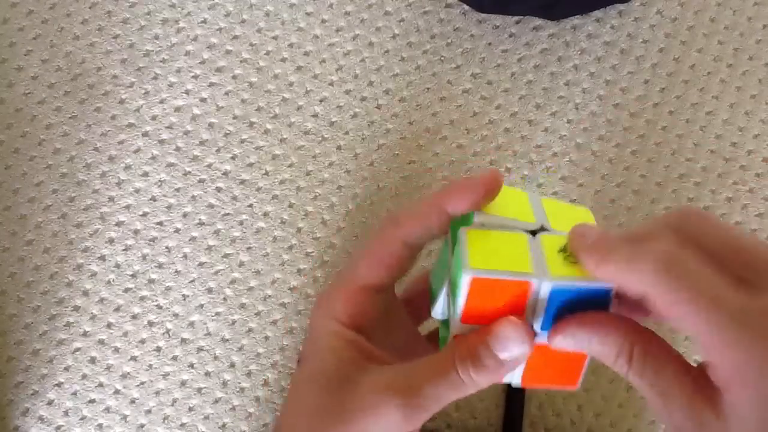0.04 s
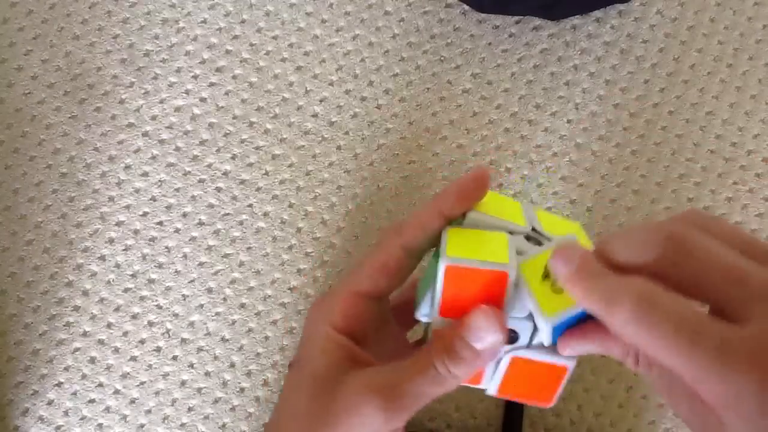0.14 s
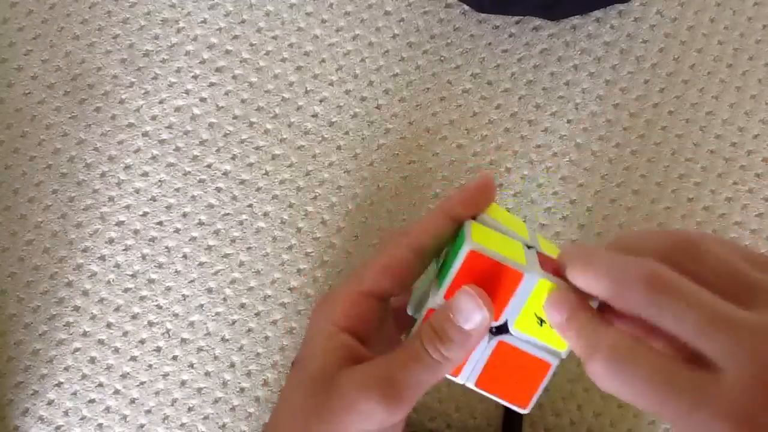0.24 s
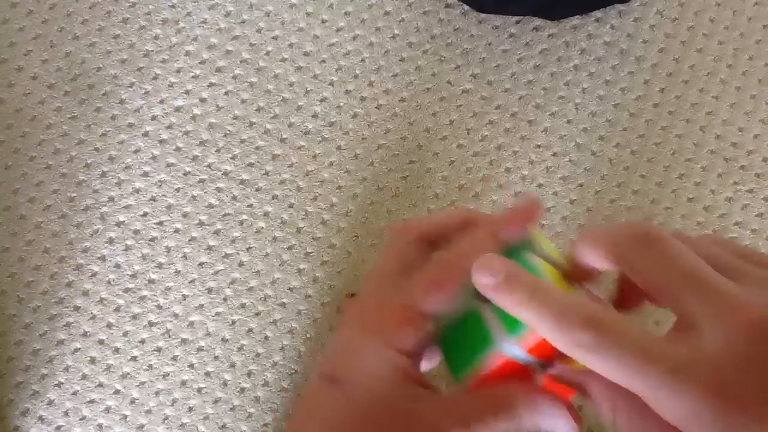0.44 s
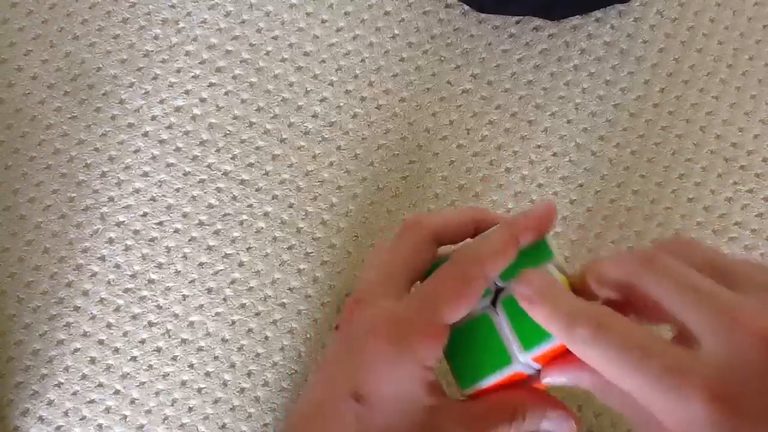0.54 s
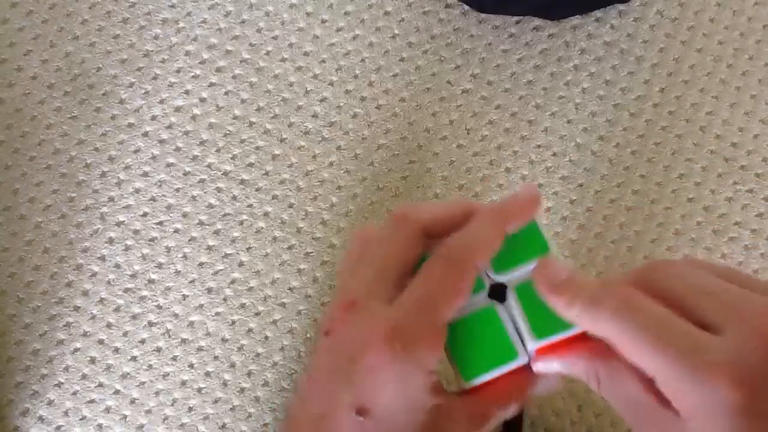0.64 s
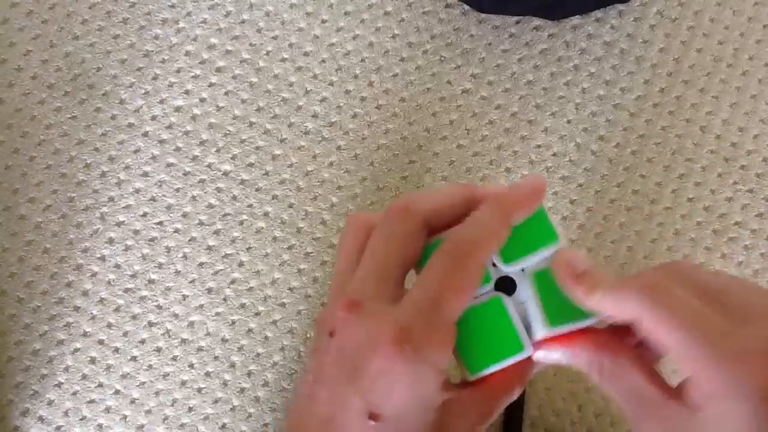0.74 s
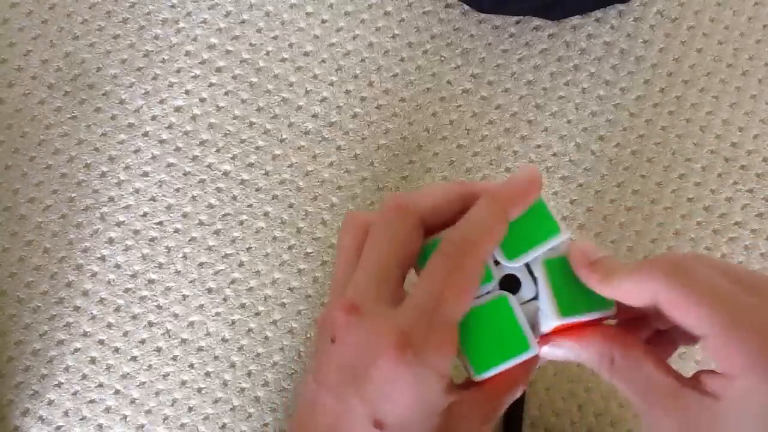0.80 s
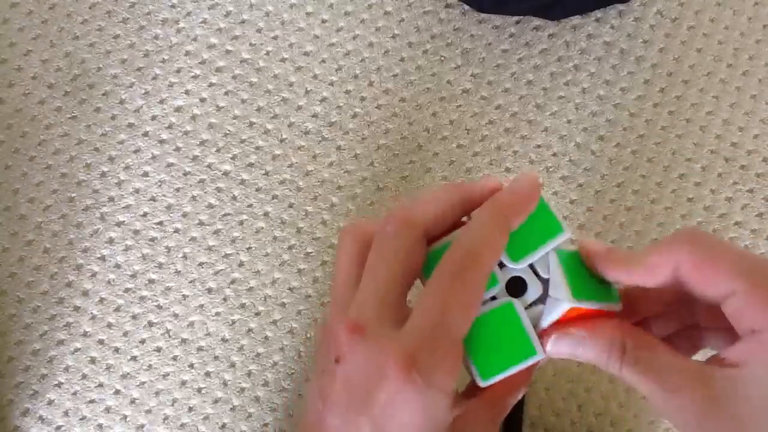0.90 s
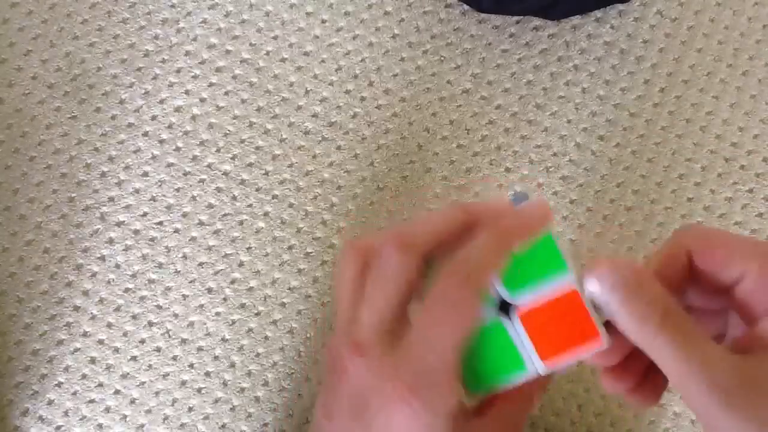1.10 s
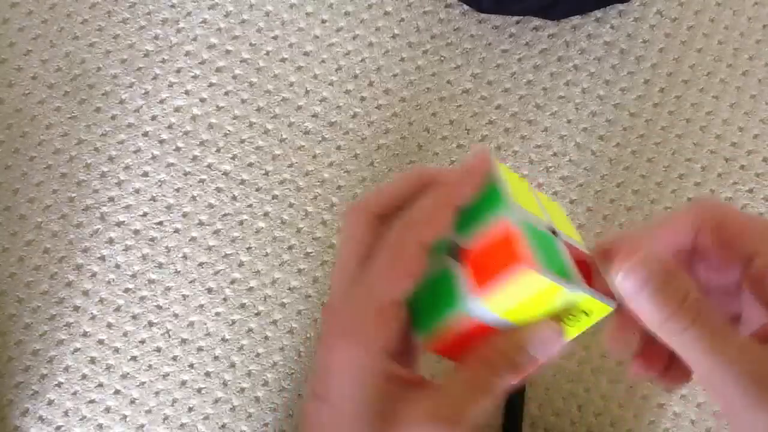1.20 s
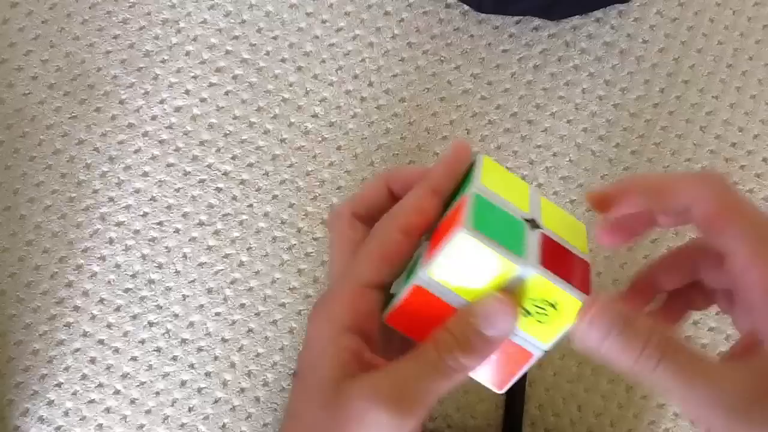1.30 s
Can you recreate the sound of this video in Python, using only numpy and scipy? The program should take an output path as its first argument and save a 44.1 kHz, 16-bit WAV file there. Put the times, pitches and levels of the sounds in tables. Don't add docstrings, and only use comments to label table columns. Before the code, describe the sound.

Hard plastic cube layers slide, tick and snap loudly twice in a small, lightly echoing room.

```python
import sys
import numpy as np
from scipy import signal
from scipy.io import wavfile
from scipy.ndimage import uniform_filter1d

SR = 44100
rng = np.random.default_rng(int(sys.argv[2]) if len(sys.argv) > 2 else 0)


def bounce(signal):
    frames = np.transpose(np.atleast_2d(signal))
    limited = np.clip(frames, -1, 1)
    pcm = np.round(limited * 32767).astype(np.int16)
    wavfile.write(sys.argv[1], SR, pcm)


def boost(x):
    u = np.asarray(x, float) / 20
    return 10 ** u


N = 59535


def evened(x):
    return x / np.sqrt(np.mean(x ** 2) + 1e-20)


def read(points, hz):
    f, value = np.transpose(points)
    return np.interp(np.log(hz + 1), np.log(f + 1), value)


def add(mix, s, sound):
    part = mix[max(round(s * SR), 0):][:len(sound)]
    part += sound[:len(part)]


def high_pass(x, order, hz):
    return signal.sosfilt(signal.butter(order, hz, "high", fs=SR, output="sos"), x)


def colour(x, points):
    hz = abs(np.fft.fftfreq(4096, 1 / SR))
    log_gain = read(points, hz) * np.log(10) / 20
    taps = np.fft.ifft(np.exp(np.conj(signal.hilbert(log_gain)))).real[:2048]
    return signal.oaconvolve(x, taps / np.linalg.norm(taps))[:len(x)]


def resonate(x, hz, width_hz):
    turn = np.exp(2j * np.pi * hz * np.arange(len(x)) / SR)
    r = np.exp(-np.pi * width_hz / SR)
    return 2 * (turn * signal.lfilter([1 - r], [1, -r], x / turn)).real


def resonate_twice(x, hz, width_hz):
    return resonate(resonate(x, hz, width_hz), hz, width_hz)


# centre in Hz, width in Hz, level in dB.
HUM = [(189, 150, -76), (265, 37, -80.5), (423, 87, -82)]
# frequency in Hz, level in dB per Hz.
AIR_COLOUR = [(30, -37.5), (100, -13), (220, -1.5), (600, -3.5), (1500, -6), (3500, -7), (13500, -11.5),
              (16000, -18.5)]
AIR_DB, AIR_FLUTTER_DB = -65.5, 2


def air():
    flutter = evened(uniform_filter1d(rng.standard_normal(N), 1500))
    hum = sum(boost(db) * evened(resonate_twice(rng.standard_normal(N), hz, width)) for hz, width, db in HUM)
    hiss = evened(colour(rng.standard_normal(N + 2048), AIR_COLOUR)[2048:])
    return hum + boost(AIR_DB + AIR_FLUTTER_DB * flutter) * hiss


# frequency in Hz, t60 in seconds.
ROOM_T60 = [(250, 0.13), (700, 0.45), (1740, 0.41), (3500, 0.46), (6500, 0.47), (9500, 0.41), (14000, 0.23)]
# delay in seconds, lift in dB.
ECHOES = [(.0125, 2), (0.025, 5), (.05, 3), (.066, 2)]
ROOM_GAP_S, ECHO_S = 0.0014, 0.002
EARLY_DB, EARLY_T60_S = -0.5, 0.066


def room(x):
    taps = np.zeros(SR // 2)
    at = np.arange(0, len(taps) - 12, 12)
    spots = at + rng.integers(0, 12, len(at))
    taps[spots] = rng.choice([-1., 1.], len(at))
    hz, t, z = signal.stft(taps, SR, nperseg=128)
    decay = boost(-60 * t / read(ROOM_T60, hz)[:, None])
    tail = signal.istft(z * decay, SR, nperseg=128)[1]
    age = np.arange(len(tail)) / SR
    tail *= np.clip(age / ROOM_GAP_S - 0.5, 0, 1)
    tail *= 1 + boost(EARLY_DB - 60 * age / EARLY_T60_S)
    tail *= boost(sum(db * np.exp(-((age - s) / ECHO_S) ** 2) for s, db in ECHOES))
    return signal.fftconvolve(x, tail / np.linalg.norm(tail))[:N]


# time in seconds, level in dB.
SENDS = [
    (.240, 1.5),
    (1.0455, -0.5),
]
# frequency in Hz, level in dB per Hz.
SEND_ONE = [(200, -43.5), (750, -9.5), (1050, -12), (2000, -9), (3300, -3.5), (5500, -7), (9000, -13.5),
            (15000, -14.5)]
SEND_TWO = [(200, -41.5), (700, -20), (1500, -18.5), (2300, -8.5), (3400, -0.9), (5000, -5.5), (9000, -11),
            (15000, -15.5)]
# centre in Hz, width in Hz, level in dB.
CAVITY = [
    [(1235, 110, -17), (1365, 240, -15.5), (3400, 1500, -14)],
    [(1300, 160, -19), (1790, 120, -21), (3160, 1400, -12)],
]


def walls():
    out = np.zeros(N)
    click = np.zeros(N)
    click[0] = 1
    for (s, db), tone, modes in zip(SENDS, [SEND_ONE, SEND_TWO], CAVITY):
        sent = colour(click, tone)
        for hz, width, cavity_db in modes:
            ring = resonate_twice(click, hz, width)
            sent = sent + boost(cavity_db) * ring / np.linalg.norm(ring)
        add(out, s, boost(db) * room(sent))
    return out


# start in seconds, pitch in Hz, level in dB, t60 in seconds.
KNOCKS = [(.2375, 400, -30, 0.024), (.2375, 716, -27, 0.037), (.238, 1220, -22, 0.056),
          (.2365, 2700, -17.5, 0.048), (1.041, 495, -28, 0.033), (1.0445, 235, -39.5, 0.045),
          (1.0428, 1735, -14.5, .024), (1.042, 1210, -29.5, .025), (1.2, 860, -37, .025),
          (.238, 950, -28, .03), (.238, 540, -36, 0.025), (1.043, 2300, -26, .025),
          (0.054, 460, -47, 0.012), (0.16, 720, -45, 0.022), (.1685, 680, -48, 0.0085)]
KNOCK_RISE_S = 0.002


def knocks():
    out = np.zeros(N)
    t = np.arange(4000) / SR
    rise = 1 - np.exp(-(t / KNOCK_RISE_S) ** 2)
    for s, hz, db, t60 in KNOCKS:
        add(out, s, rise * boost(db - 60 * t / t60) * np.sin(2 * np.pi * hz * t))
    return out


# start in seconds, length in seconds, grit in dB, hollow ring in Hz, hollow in dB.
SLIDES = [(0.011, 0.22, -63.5, 1490, -84.5), (0.091, 0.047, -50, 1580, -51),
          (.14, 0.033, -59.5, 1610, -60.5), (0.157, 0.029, -53, 1670, -48.5),
          (0.173, 0.023, -54, 1750, -53.5), (0.214, 0.026, -49, 1750, -40), (.231, 0.014, -23, 1200, -37),
          (0.507, 0.024, -52.5, 1720, -69.5), (.527, 0.028, -55.5, 1800, -64),
          (0.645, 0.077, -60.5, 1700, -68), (0.784, 0.039, -55, 2300, -59), (.805, 0.045, -57, 1970, -55.5),
          (.81, .07, -60, 1440, -58), (0.909, 0.032, -52, 1390, -57), (0.921, 0.039, -57, 1654, -48.5),
          (.94, .045, -57.5, 1704, -54.5), (1.031, 0.011, -46.5, 1293, -49.5),
          (1.0412, 0.01, -21, 1800, -40.5)]
# frequency in Hz, level in dB per Hz.
GRIT_COLOUR = [(300, -37), (900, -14), (1500, -3.5), (3300, -1.5), (6000, -10), (15500, -26)]
SLIPS_PER_S, SLIP_SPREAD_DB = 2900, 2.8
SLIDE_PEAK = 0.35
HOLLOW_WIDTH_HZ = 540


def slides():
    grit, hollow = np.zeros((2, N))
    slipping = rng.random(N) < SLIPS_PER_S / SR
    strength = boost(SLIP_SPREAD_DB * np.minimum(rng.exponential(1, N), 4))
    slips = slipping * strength * rng.choice([-1., 1.], N)
    slips = evened(slips + 0.29 * rng.standard_normal(N))
    for s, length, grit_db, hz, hollow_db in SLIDES:
        u = np.arange(0, length + 0.032, 1 / SR) / length
        swell = np.interp(u, [0, SLIDE_PEAK * 0.34, SLIDE_PEAK, 1], [0.14, 0.4, 1, 0.04])
        stroke = swell * slips[round(s * SR):][:len(u)]
        ring = resonate(resonate(stroke, hz, 2 * HOLLOW_WIDTH_HZ), hz, HOLLOW_WIDTH_HZ)
        add(grit, s, boost(grit_db) * stroke)
        add(hollow, s, boost(hollow_db + 11.5) * ring)
    return colour(grit, GRIT_COLOUR) + hollow


# frequency in Hz, level in dB per Hz.
CRACK_COLOUR = [(200, -38.5), (900, -11.5), (1700, -8.5), (3500, -2), (6000, -1), (10000, -11),
                (16000, -21.5)]
RING_CYCLES = 12
RING_RISE_S, CRACK_T60_S, BRIGHT_HZ = 0.0003, 0.008, 6500


def blows(rows, crack_db, bright_db):
    t = np.arange(600) / SR
    sound, hits = np.zeros((2, N))
    noise = rng.standard_normal((len(rows), 2, len(t))) * boost(-60 * t / CRACK_T60_S)
    for (s, db, hz, edge_db), (crack, edge) in zip(rows, noise):
        shape = (1 - np.exp(-t / RING_RISE_S)) * boost(-60 * t * hz / RING_CYCLES)
        ring = shape / shape.max() * np.sin(2 * np.pi * hz * t)
        bright = boost(edge_db + bright_db) * high_pass(edge, 4, BRIGHT_HZ)
        blow = ring + colour(boost(crack_db) * crack + bright, CRACK_COLOUR)
        peak = abs(signal.hilbert(blow)).max()
        add(sound, s - RING_RISE_S, boost(db) * blow / peak)
        add(hits, s - RING_RISE_S, boost(db) * np.ones(1))
    return sound, hits


# time in seconds, peak in dB, ring in Hz, bright edge in dB.
TICKS_EARLY = [(0.0828, -38, 4200, -15), (0.094, -45, 4460, -15), (0.1029, -30, 3880, -11),
               (0.1069, -30, 2600, -11), (0.1159, -40, 3010, -13), (0.121, -43, 4930, -8),
               (0.1307, -40, 3140, -13), (0.1432, -42, 1900, 2), (0.1625, -44, 1420, -14),
               (0.1676, -39, 7600, -2), (0.1688, -37, 3000, -6), (0.1703, -38, 1700, -14),
               (0.1783, -40, 3400, -5), (0.1797, -41, 6800, -4), (0.1828, -42, 3700, -6),
               (0.1873, -43, 1740, -14), (0.1977, -45, 1660, -15), (0.5041, -51, 3550, -6),
               (0.5088, -44, 3340, -11), (0.5134, -40, 3320, -14), (0.5315, -45, 4600, -12),
               (0.5341, -46, 2410, -8), (0.5372, -45, 3140, -10)]
TICKS_LATE = [(0.6388, -52, 3100, -4), (0.6413, -52, 5100, -9), (0.6532, -49, 3680, -8),
              (0.6627, -49, 2950, -12), (0.6662, -44, 3830, -7), (0.6726, -44, 3080, -16),
              (0.6847, -48, 4400, -8), (0.6865, -47, 2000, -14), (0.7072, -55, 3830, -9),
              (0.7888, -46, 3270, -9), (0.7914, -39, 3200, -13), (0.7946, -47, 2890, -14),
              (0.8039, -50, 2910, -6), (0.8126, -41, 3500, -2), (0.8147, -45, 5600, -4),
              (0.8209, -39, 6500, -4), (0.8281, -41, 4300, -6), (0.8396, -43, 5000, -3),
              (0.9126, -34, 6030, -6), (0.9299, -41, 1550, -13), (1.2044, -46, 3960, -4)]
TICKS_EXTRA = [(.9123, -38, 2350, -8), (.9131, -35, 4200, -4), (.9332, -40, 1800, -20),
               (.9385, -42, 4500, -5), (.9545, -45, 1900, -14), (1.204, -48, 9000, -3)]
LATE_TICKS_DB = 3


def ticks():
    sound = blows(TICKS_EARLY + TICKS_LATE + TICKS_EXTRA, crack_db=-4, bright_db=-3)[0]
    late = np.arange(N) > 0.244 * SR
    return sound * boost(LATE_TICKS_DB * late)


# time in seconds, peak in dB, ring in Hz, bright edge in dB.
SNAP_ONE = [(0.2199, -36, 1770, -14), (0.2263, -28, 4670, -6), (0.2287, -25, 3230, -6),
            (0.2317, -19, 6050, -5), (0.2339, -17, 3750, -6), (0.2357, -14, 2410, -7),
            (0.2379, -6, 2930, -6), (0.2395, -3, 5580, -6), (0.2405, -4, 3340, -8), (0.2422, -7, 4540, -5),
            (0.2435, -12, 3380, -6)]
SNAP_TWO = [(1.0334, -40, 1310, -6), (1.0367, -28, 2600, -28), (1.0371, -31, 4300, -28),
            (1.0414, -20, 4200, -9), (1.0425, -8, 4410, -9), (1.0437, -6, 5040, -4),
            (1.0451, -10, 6930, -4), (1.0463, -3, 3660, -10), (1.0466, -12, 5400, -8),
            (1.0483, -14, 3730, -5), (1.0506, -16, 3100, -9)]
# centre in Hz, width in Hz, level in dB.
SHELL_ONE = [(2080, 440, -10.5), (3200, 460, 2.5), (5360, 310, 3), (6580, 250, 4), (7840, 400, 1)]
SHELL_TWO = [(2650, 280, -12), (3670, 280, 4.5), (5500, 490, 4), (7000, 590, -0.5)]


def snap(rows, shell, shell_db):
    sound, hits = blows(rows, crack_db=-0.5, bright_db=6)
    body = np.zeros(N)
    for hz, width, db in shell:
        body += boost(db) * resonate(hits, hz, width) / (2 * np.pi * width / SR)
    return sound + boost(shell_db) * high_pass(body, 2, 700)


def snaps():
    first = boost(-3.8) * snap(SNAP_ONE, SHELL_ONE, shell_db=-11)
    second = boost(0.5) * snap(SNAP_TWO, SHELL_TWO, shell_db=-10.5)
    return first + second


ROOM_DB = -10
SNAP_THIN_HZ, SMALL_THIN_HZ = 1036, 590


def scene():
    cube = high_pass(snaps(), 4, SNAP_THIN_HZ)
    small = ticks() + slides()
    cube = cube + high_pass(small + boost(ROOM_DB) * room(small), 2, SMALL_THIN_HZ)
    return (cube + knocks() + walls() + air())[None]


def top_cut(x):
    return signal.sosfilt(signal.butter(12, 16470, fs=SR, output="sos"), x)


# time in seconds, change in dB.
GAIN_MOVES = [
    (0.244, -4),
    (.62, 2),
    (1.05, -5),
]
GAIN_GLIDE_S = 0.11


def record(dry):
    t = np.arange(N) / SR
    gain_db = sum(db * (1 - np.exp(-np.maximum(t - s, 0) / GAIN_GLIDE_S)) for s, db in GAIN_MOVES)
    low_pass = signal.firwin(401, 15550, window=("kaiser", 3), fs=SR)
    x = signal.oaconvolve(dry * boost(gain_db), low_pass[None], "same")
    x = high_pass(x, 2, 90)
    return top_cut(x)


dry = scene()
out = record(dry)
bounce(out)
```